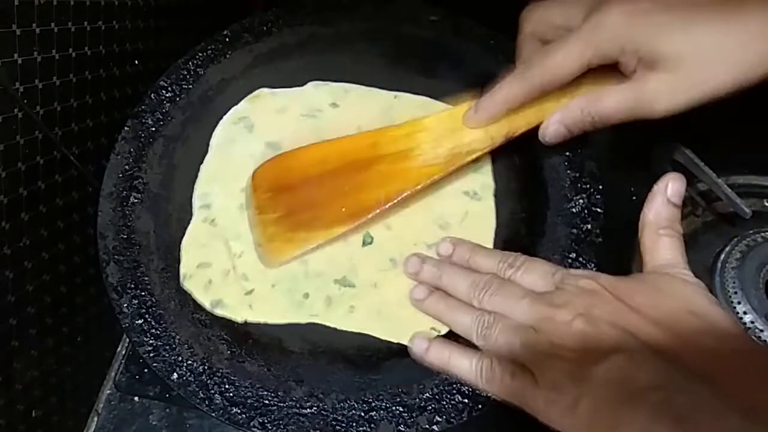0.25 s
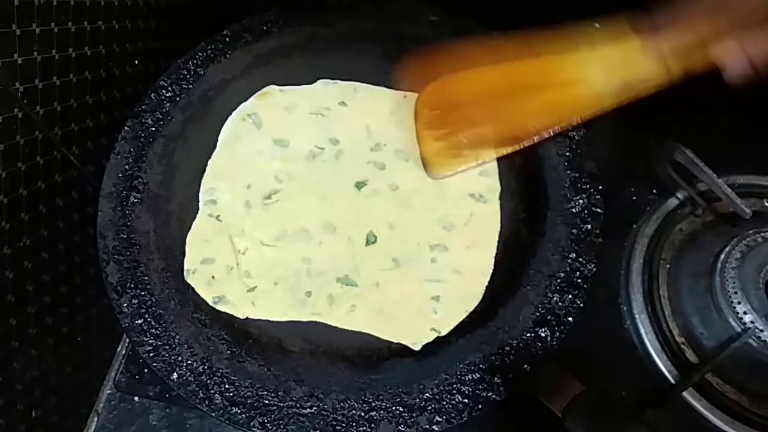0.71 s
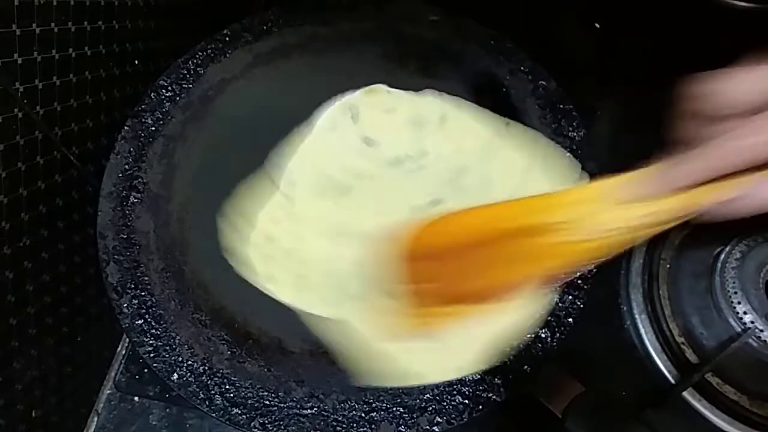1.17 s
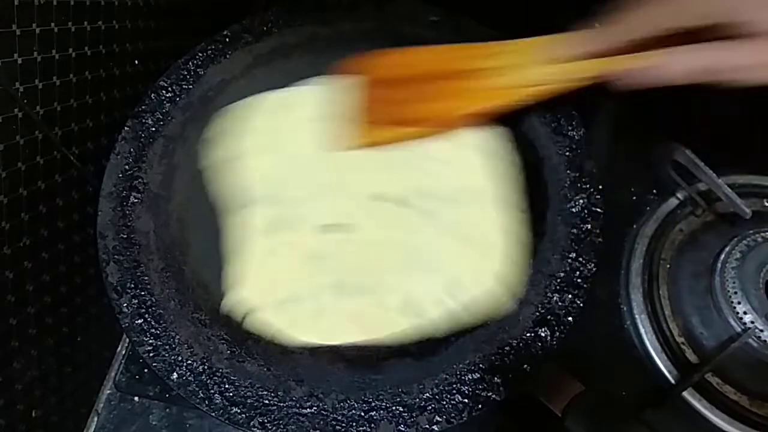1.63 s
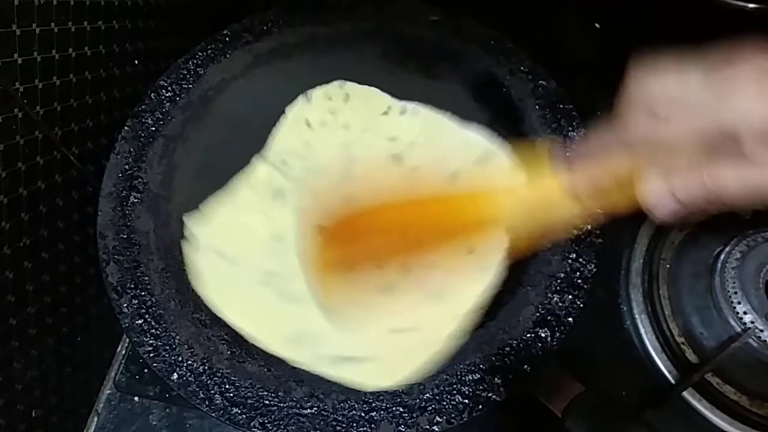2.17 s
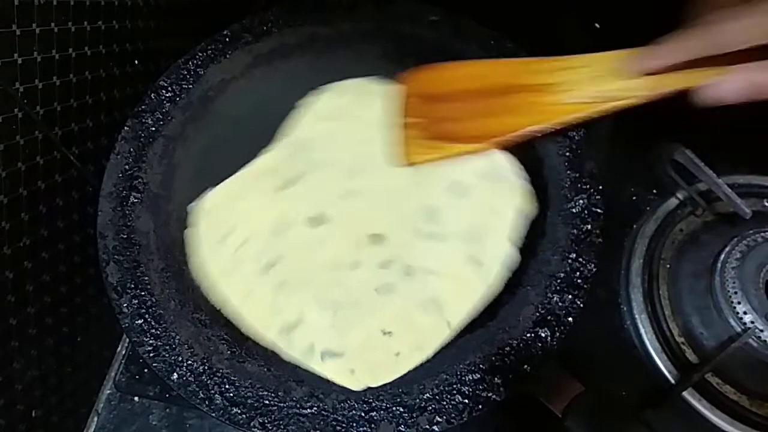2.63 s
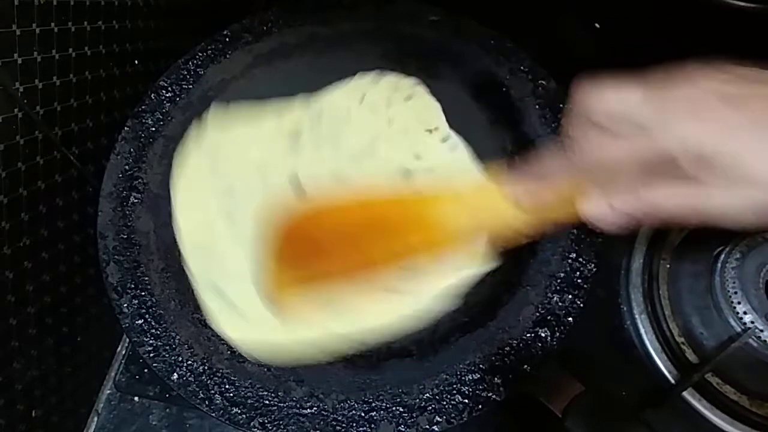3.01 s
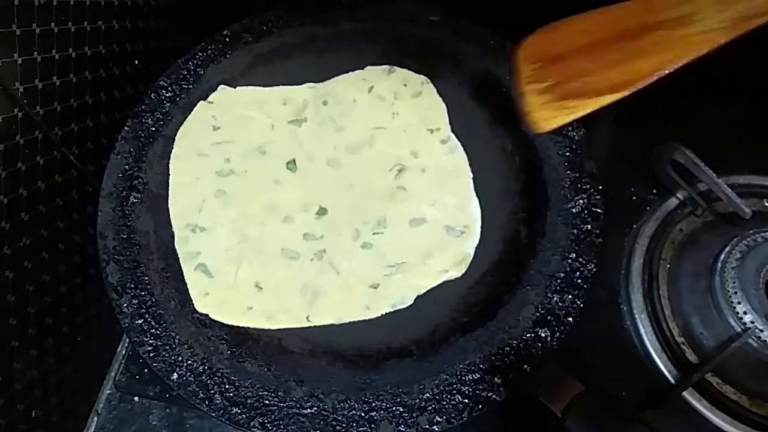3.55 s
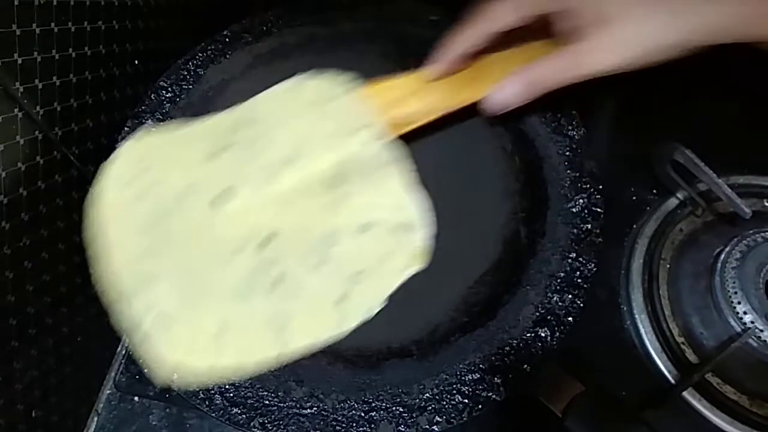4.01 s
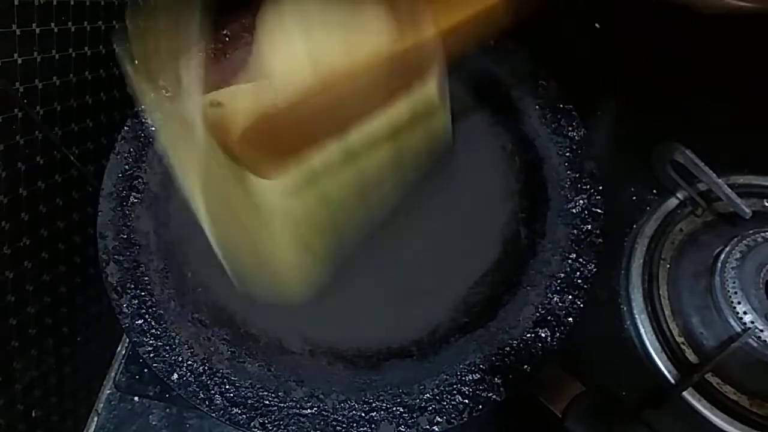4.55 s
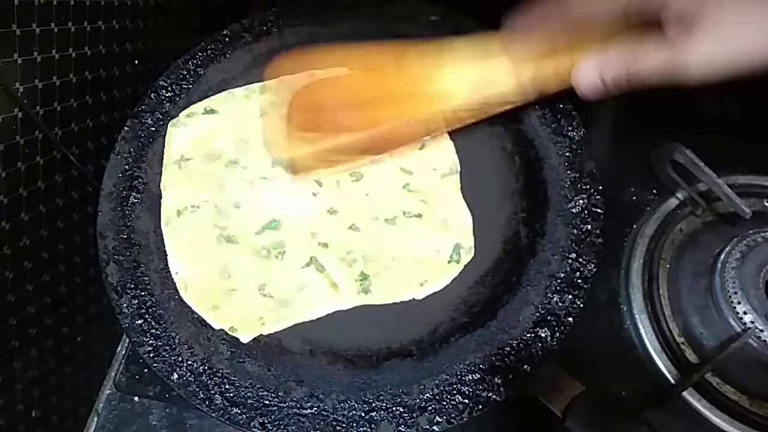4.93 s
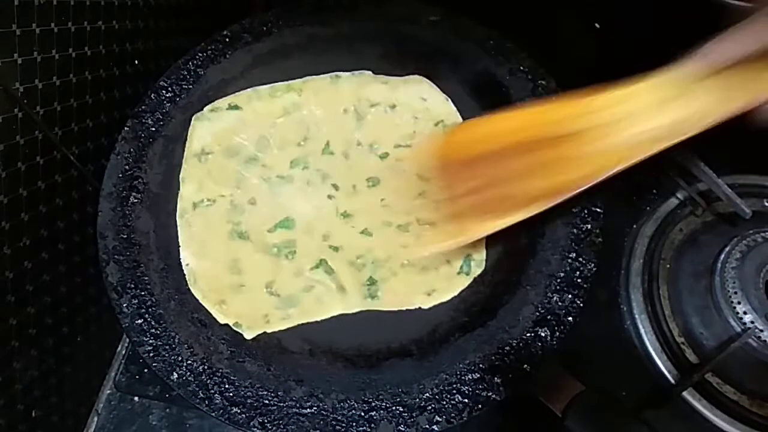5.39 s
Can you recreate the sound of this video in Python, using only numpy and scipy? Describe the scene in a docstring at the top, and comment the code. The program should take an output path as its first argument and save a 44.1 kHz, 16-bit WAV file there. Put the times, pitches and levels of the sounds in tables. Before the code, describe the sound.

In a small hard kitchen, heard close and slightly to the left, a wooden spatula shoves flatbread around a hot iron griddle. Low thumps and woody scrapes mix with airy, crackling hisses of sliding dough and tiny fat ticks. A longer hollow scrape sinks in pitch as the blade goes underneath; sharp knocks follow the flip, then firm presses and one last rub.

```python
"""A hiss of sliding dough and a low judder are heard first: a flatbread is spun on a hot iron griddle
with a wooden spatula, then lifted, flipped and pressed down. Friction noise makes the hiss and scrape,
stick-slip impulses and shoves ring the griddle's modes, and the blade drones in its own modes.
Short noise bursts make the wood's knocks on the iron and the ticks of hot fat.
A small hard kitchen answers, over a faint noise of the still room."""
import sys
import numpy as np
from scipy import signal
from scipy.fft import rfft, irfft, next_fast_len
from scipy.io import wavfile
from scipy.ndimage import map_coordinates

SR = 44100
rng = np.random.default_rng(int(sys.argv[2]) if len(sys.argv) > 2 else 0)


def master(y):
    """Save y as 16-bit WAV."""
    cut = np.clip(np.atleast_2d(y).T, -1, 1)
    pcm = np.round(cut * 32767)  # scale
    wavfile.write(sys.argv[1], SR, pcm.astype(np.int16))


N = 249857

# Still room, noise spectrum: hz, relative_level_db
ROOM_AIR = [(25, 14), (50, 12.5), (100, 3), (300, -18.5), (600, -21.5), (1200, -19.5), (3000, -39),
            (10000, -28.5), (16000, -41)]
# Reverberation of the kitchen: hz, t60_s
KITCHEN_DECAY = [(80, 0.86), (300, 0.3), (1200, 0.22), (5000, 0.27), (10000, 0.27), (16000, 0.066)]
# Difference between the ears in the reflections: hz, gain_db; long waves reach both ears alike
EAR_DIFFERENCE = [(100, -26.0), (300, 2.0), (600, 2.5), (2000, 3.5)]
# Lean to the left: hz, gain_db (up on the left, down on the right)
LEAN = [(100, 2.6), (400, 2.3), (1000, 2.53), (4500, 1.9), (9000, 2.9), (13000, .4)]
TOP_HZ = 15900

# Spitting fat: time_s, relative_peak_db
FAT_SPITS = [(0.0784, -22.5), (0.2648, -37), (0.3016, -28), (0.409, -32.5), (0.5367, -35.5),
             (0.5736, -35.5), (0.7118, -47), (0.741, -51.5), (0.9335, -40), (0.9675, -40), (1.1695, -35.5),
             (1.1864, -36), (1.27, -41.5), (1.732, -37.5), (1.7976, -35), (1.9759, -34), (2.2052, -41.5),
             (2.2232, -39), (2.235, -34), (2.246, -37.5), (2.2505, -31), (2.2942, -35.5), (2.3277, -35),
             (2.351, -35.5), (2.3655, -39.5), (2.6584, -40.5), (2.9228, -31.5), (2.9412, -41.5),
             (2.9612, -31.5), (3.057, -31), (3.0627, -34), (3.0997, -30.5), (3.487, -34.5), (4.318, -61.5),
             (4.8366, -33), (5.2579, -43)]
# Spectrum of fat ticks and crackle: hz, relative_level_db
FAT_SPECTRUM = [(2000, -26.5), (5000, -11.5), (7500, -10), (10000, 5), (13000, 2.5), (16000, 2)]

# Resonances of the griddle on its stove: centre_hz, width_hz, level_db
GRIDDLE_MODES = [(24.3, 27, -14), (52, 17, -29), (80.7, 7.5, -1), (107.4, 9.7, 0.5), (120, 14, -4),
                 (158.5, 8.7, 0.5), (184.4, 5.6, 3), (206.8, 11.5, 3), (259.6, 23, -1.5), (302.2, 14, -3),
                 (334.7, 17.5, -0.5), (408.4, 7.7, -5.5), (428.4, 11.9, -6.5), (512, 41.5, -8.5),
                 (611, 21.5, -7.5), (631.4, 26, -12), (1198, 32, -26.5)]
# Group delay of the griddle's answer to a shove: hz, delay_s
SETTLING_DELAY = [(100, 0.01004), (190, 0.01805), (250, 0.0082), (320, 0.00034)]
# Resonances of the plate under hard wood: centre_hz, width_hz, level_db
PLATE_MODES = [(1132, 32, 1.5), (1247, 48, 9), (1375, 80, 1), (1511, 45, 4.5), (1648, 100, -1.5),
               (1863, 110, -1), (2163, 210, -2.5), (2510, 260, -3), (3020, 260, -9.5), (3250, 120, -9),
               (3900, 350, -6.5), (4150, 140, -7), (4770, 200, -12), (5290, 450, -10), (6200, 300, -14.5)]
# Resonances of the wooden blade: centre_hz, width_hz, level_db
BLADE_MODES = [(758.4, 47, 3), (839, 27, 0), (869, 35, 5.5), (997, 31, -0.5), (1137, 50, 1)]

# Hard contacts of wood and iron: time_s, relative_peak_db, crack_db and clack_db relative to that peak
WOOD_KNOCKS = [(0.067, -37.5, 3, -0.5), (0.079, -36.5, -6, -2), (0.0971, -24, -7, -12),
               (0.239, -46, -11, -14), (0.5357, -33.5, -13, -15.5), (1.112, -47, -22, -17),
               (1.487, -44, -22, -12), (1.515, -42, -21.5, -8), (2.173, -44, -24, -14),
               (2.383, -34, -20, -15), (2.524, -42.5, -16, -2.5), (2.76, -42, 7.5, 4.5),
               (2.772, -34.5, -21, -4.5), (2.838, -44, -12, -21), (2.88, -42, 5, -0.5),
               (3.0, -42.5, 2.5, -4), (3.081, -40, -17, -8.5), (3.163, -46, -4, -18), (3.228, -48, -7, -16),
               (3.396, -32.5, -12, -9.5), (3.4, -32.5, -7, -14), (3.725, -38, -17, -5.5),
               (3.792, -41, -17, -9), (3.83, -42.5, -20, -9), (3.882, -47.5, -20, -6),
               (4.1, -36.5, 0, -0.5), (4.146, -41.5, 2, 1), (4.245, -51, -23.5, -6.5),
               (4.291, -55, -25, -1), (4.454, -38.5, 0.5, -19), (4.4632, -22.5, -16.5, -16.5),
               (4.485, -25, 8.5, -8), (4.4867, -30, 10.5, -7.5), (4.495, -34.5, -18, -2),
               (4.811, -46, -22, -3.5), (4.8181, -29, -7, -15), (4.921, -30.5, 1, -7),
               (4.93, -26.5, -4, -7), (4.969, -34.5, -0.5, -4), (5.468, -37, -19, -7),
               (5.48, -28, 2.5, -5.5)]
# Spectrum of a contact's bright crack: hz, relative_level_db
CRACK_SPECTRUM = [(1500, -21), (4000, 4.5), (7000, 1.5), (9000, 7), (11000, 8), (13000, 0.5), (16000, -8)]
# Spectrum of the dull wooden clack: hz, relative_level_db
CLACK_SPECTRUM = [(250, -11.5), (480, 14), (720, -11.5), (1000, -5.5), (1400, 1.5), (2000, -18.5),
                  (3000, -16), (4500, -7.5), (7000, -14), (12000, -27.5)]
# Spectrum of the snap of the blade's edge: hz, relative_level_db
SNAP_SPECTRUM = [(500, -22), (900, -11), (1300, 3), (2100, -3), (3000, -9), (6000, -19.5), (12000, -31.5)]

# Soft shoves that rock the griddle: time_s, relative_peak_db, shudder_db relative to that peak
SOFT_SHOVES = [(0.004, -25, -18.5), (0.06, -19.5, -11.5), (0.089, -17.5, -10.5), (0.117, -27, -15),
               (0.162, -24, -9.5), (0.234, -25.5, -9.5), (0.279, -30.5, -9.5), (0.332, -29.5, -11.5),
               (0.4, -28.5, -11.5), (0.441, -31, -11), (0.528, -29.5, -10.5), (1.005, -41, -13),
               (1.107, -32.5, -12.5), (1.148, -24.5, -9.5), (1.243, -29.5, -11.5), (1.31, -31.5, -12),
               (1.368, -32.5, -11), (1.437, -30, -13), (1.482, -29, -12), (1.516, -30.5, -10),
               (1.562, -28, -11), (1.69, -50, -11), (1.832, -45.5, -11), (1.857, -50, -10.5),
               (2.19, -41, -11.5), (2.373, -27.5, -10.5), (2.44, -37, -13), (2.523, -32, -10.5),
               (2.576, -34.5, -11.5), (2.665, -41.5, -9), (2.752, -25, -14), (2.762, -26.5, -21),
               (2.837, -33.5, -10), (2.873, -23.5, -10.5), (2.991, -24.5, -11), (3.074, -27, -10.5),
               (3.155, -31, -10), (3.22, -30.5, -11.5), (3.27, -35, -9), (3.313, -37, -11),
               (3.391, -31, -17.5), (3.732, -34, -21.5), (3.794, -41, -21), (4.086, -23.5, -9.5),
               (4.139, -26.5, -12.5), (4.243, -33.5, -10.5), (4.285, -38, -6.5), (4.466, -26.5, -13),
               (4.494, -28.5, -16), (4.567, -35, -8.5), (4.647, -38, -10), (4.703, -41, -12.5),
               (4.742, -54, -13), (4.853, -27.5, -14.5), (4.911, -22.5, -8), (4.931, -28, -18),
               (4.959, -22.5, -8), (5.001, -24.5, -7.5), (5.074, -35.5, -8), (5.442, -39, -15.5),
               (5.46, -30, -18), (5.497, -30, -13.5)]
SHUDDER_START_HZ, SHUDDER_SAG_HZ_PER_S = 335.7, 550  # the start is scattered by a few per cent
SHUDDER_HOLD_S, SHUDDER_FADE_DB_PER_S = 0.013, 651.5
# Damping of a shove by the dough: hz, gain_db
SHOVE_CUSHION = [(70, -6.5), (190, -5.0), (330, 0), (600, -3), (1200, -1.5)]
# Tone of the plate's chatter: hz, gain_db
CHATTER_TONE = [(1400, -6.5), (4000, -5.5)]

# Weight of the hand, which drives the lowest modes: time_s, gain_db
HAND_WEIGHT = [(0, 7), (.6, 0), (1.8, -1), (2.3, 14), (2.6, 2), (2.9, 10), (3.4, 3), (3.7, -22), (3.95, -1),
               (4.2, 0.5), (5.6, 14.5)]
# Part of the rumble that the weight changes: hz, gain_db
DEEP_PART = [(110, -7.5), (190, -26.5), (400, -54)]

# Strokes of the spatula: start_s, length_s, push_db, rub_db, drone_db (all three relative),
# easing_db_per_s (below 0 when bearing down)
SPATULA_STROKES = [(-0.03, 0.021, -33.5, -51.5, -49.5, 35.5), (0.069, 0.027, -56.5, -41.5, -42.5, 43),
                   (0.12, 0.45, -44, -55.5, -58, 14.5), (0.58, 0.13, -56.5, -61, -92, 72),
                   (0.978, 0.18, -55.5, -70, -72, -22), (1.098, 0.12, -44.5, -56.5, -56.5, 25),
                   (1.22, 0.155, -47.5, -61.5, -69, 10), (1.36, 0.069, -57, -66.5, -60.5, 9.5),
                   (1.459, 0.17, -45, -55, -59.5, 32), (1.816, 0.029, -67.5, -89, -93, 18),
                   (2.157, 0.061, -56, -57.5, -60, 12), (2.321, 0.045, -50, -60.5, -75, -59),
                   (2.358, 0.16, -43, -54.5, -58.5, 70), (2.488, 0.12, -44.5, -62, -57.5, 46),
                   (2.609, 0.1, -53, -78, -73, 58), (2.752, 0.024, -41, -50.5, -47, 20),
                   (2.809, 0.13, -44.5, -58, -63, 24), (2.978, 0.17, -48.5, -60.5, -65, 26),
                   (3.15, 0.32, -51.5, -69.5, -80, 8), (3.385, 0.015, -45.5, -48.5, -55.5, 33),
                   (3.48, 0.21, -83, -55.5, -81, -21), (3.713, 0.15, -46, -50.5, -69, -11.5),
                   (3.9, 0.14, -50, -55.5, -61, 12), (4.074, 0.15, -39.5, -52.5, -64.5, 50),
                   (4.22, 0.15, -48, -64.5, -82, 46.5), (4.439, 0.06, -41.5, -41.5, -52.5, 7.5),
                   (4.55, 0.1, -48, -60, -68, 71), (4.808, 0.13, -49.5, -52.5, -58, 23),
                   (4.89, 0.16, -35.5, -44, -52, 41.5), (4.998, 0.17, -43, -61, -64.5, 55),
                   (5.427, 0.033, -67, -60.5, -69, 2), (5.454, 0.18, -39.5, -49, -58.5, 46)]
STROKE_ATTACK_S = 0.03
PUSH_FADE_DB_PER_S, RUB_FADE_DB_PER_S, DRAG_FADE_DB_PER_S = 166, 177, 183  # once the hand lets go
# Damping of the push by the dough: hz, gain_db; it shapes the rumble of the modes
PUSH_CUSHION = [(560, 2.5), (720, -5.5), (1000, -13.5), (1250, 0.0), (2500, -8.5)]
# Dulling of the scrape by the oily surface: hz, gain_db
OIL_DULLING = [(1300, -0.5), (2300, -1), (3300, -2.5), (6000, -2.5)]
# Blade sliding under the bread: time_s, share of the rubbing's power that sounds in the gap (0-1),
# spacing_hz of the gap's resonances, loudest_hz of their bands
BLADE_UNDER_BREAD = [(3.45, 0.3, 722, 3800), (3.52, 0.96, 694, 3000), (3.59, 0.38, 654, 2720),
                     (3.65, 0.94, 623, 2300), (3.72, 0.83, 633, 1850), (3.77, 0.24, 600, 1850),
                     (3.81, 0, 529, 1650), (3.88, .6, 512, 1430), (3.96, 1, 385.7, 850),
                     (4.03, 1, 372, 720), (4.08, 0, 358, 700)]

# Slides of the bread over the iron: start_s, speeding_up_s, gliding_s, relative_level_db, slowing_db_per_s
BREAD_SLIDES = [(-0.03, 0.018, 0.01, -53, 154), (0.058, 0.019, 0.025, -51.5, 100.5),
                (0.24, 0.06, 0.15, -56, 66.5), (0.481, 0.22, 0.044, -46.5, 135),
                (0.977, 0.047, 0.13, -46.5, 112), (1.39, 0.071, 0.098, -46, 63),
                (1.775, 0.023, 0.17, -47, 149), (2.17, 0.065, 0.03, -59.5, 66),
                (2.33, 0.076, 0.093, -53.5, 121.5), (2.734, 0.013, 0.048, -45.5, 57.5),
                (3.447, 0.15, 0.13, -45, 62.5), (4.0, 0.052, 0.047, -50.5, 285),
                (4.442, 0.013, 0.048, -54, 106), (4.807, 0.025, 0.059, -50.5, 105),
                (4.88, 0.038, 0.06, -44.5, 128), (5.462, 0.028, 0.11, -45.5, 105)]
GLIDE_SAG_DB_PER_S = 5
# Sizzle of the resting dough: start_s, length_s, relative_level_db
DOUGH_RESTS = [(-0.03, 3.6, -63), (4.709, 0.03, -58), (5.24, 0.096, -62.5), (5.365, 0.15, -61)]
REST_ATTACK_S, REST_FADE_DB_PER_S = 0.12, 220
# Spectrum of the sliding dough: hz, relative_level_db
DOUGH_SPECTRUM = [(600, -42.5), (1500, -26.5), (2700, -13.5), (4300, -13), (6500, -8.5), (8200, -2.5),
                  (10300, 3), (12000, 0), (13500, -1.5), (16000, -3)]


def amp(db):
    """The decibel law: level to amplitude gain."""
    return 10 ** (np.asarray(db) / 20)


def unit(x):
    """Normalisation to rms 1."""
    return x / np.sqrt(np.mean(x ** 2) + 1e-20)


def along(points, hz):
    """Interpolation of (Hz, value) points on a logarithmic frequency axis."""
    f, v = np.transpose(points)
    return np.interp(np.log(hz + 1), np.log(f + 1), v)


def curves(rows):
    """Linear interpolation in time: one curve for each column after the time."""
    s, *cols = np.transpose(rows)
    return [np.interp(np.arange(N) / SR, s, c) for c in cols]


def wobble(rate):
    """Slow random fluctuation: a smooth curve through rate random knots per second."""
    knots = rng.standard_normal(int(N * rate / SR) + 4)
    return map_coordinates(knots, [np.arange(N) * rate / SR])


def filtered(x, response):
    """Linear filtering: the spectrum of x times a response that is a function of frequency."""
    n = x.shape[-1]
    m = next_fast_len(n + SR // 4)
    spectrum = rfft(x, m) * response(np.fft.rfftfreq(m, 1 / SR))
    return irfft(spectrum, m)[..., :n]


def coloured(x, spectrum):
    """Spectral shaping by a smooth gain curve in dB."""
    return filtered(x, lambda hz: amp(along(spectrum, hz)))


def ring(modes):
    """Modal superposition: the impulse response of damped resonances with alternating sign."""
    def body(f):
        total = 0
        for k, (centre, width, db) in enumerate(modes):
            damping = 1j * f * width
            total = total + (-1) ** k * amp(db) * damping / (centre ** 2 - f ** 2 + damping)
        return total
    return filtered(signal.unit_impulse(SR // 4), body)


def through(x, answer):
    """Convolution: a force excites a ringing body."""
    return signal.fftconvolve(x, answer)[:len(x)]


def grains(rate, spread_db):
    """Stick-slip friction as a random train of impulses of very unequal size, rms 1."""
    chance, size = rng.random(N), rng.standard_normal((2, N))
    slips = (chance < rate / SR) * np.sign(size[0])
    return unit(slips * amp(spread_db * size[1]))


def burst(t60):
    """A contact as a cluster of micro-impacts: noise that builds up quickly and decays exponentially."""
    t = np.arange(SR // 4) / SR
    return rng.standard_normal(len(t)) * amp(-60 * t / t60) * (1 - np.exp(-t / 0.00024))


def crack(t60):
    """A dry snap: keeping only the phase of a burst makes all frequencies about equally strong."""
    even = irfft(np.exp(1j * np.angle(rfft(burst(t60)))))
    return even[:SR // 20]


def spread(make, width):
    """Partial coherence of a wide source: a shared signal plus each ear's own, rms 1."""
    shared = make()
    return unit(np.array([shared + width * make(), shared + width * make()]))


def add(track, s, db, sound):
    """Superposition: a sound is placed at time s, scaled to a peak of db."""
    part = track[..., max(round(s * SR), 0):][..., :sound.shape[-1]]
    part += amp(db) * sound[..., :part.shape[-1]] / np.abs(sound).max()


def gesture(start, attack, length, sag, fade):
    """Envelope of a motion: a rise, a sag after it and a fade from start + length; slopes in dB per s."""
    t = np.maximum(np.arange(N) / SR - start, 0)
    loss_db = sag * np.clip(t - attack, 0, length) + fade * np.maximum(t - length, 0)
    return np.minimum(t / attack, 1) * amp(-loss_db)


def effort(fade, axis):
    """Power sum of all strokes as one gain; axis picks the push (0), the rub (1) or the drone (2)."""
    power = 0
    for s, length, *levels, easing in SPATULA_STROKES:
        gain = amp(levels[axis]) * gesture(s, STROKE_ATTACK_S, length, easing, fade)
        power = power + gain ** 2
    return np.sqrt(power)


def still_room(level_db):
    """Diffuse background: shaped noise, partly common to both ears."""
    air = rng.standard_normal(N) + 0.61 * rng.standard_normal((2, N))
    return amp(level_db) * unit(coloured(air, ROOM_AIR))


def kitchen(x, early_db, tail_db):
    """Room response: direct sound, early scatter from stove and near walls, and a decaying tail."""
    hz, t, z = signal.stft(rng.standard_normal((2, SR * 2 // 3)), SR, nperseg=256)
    decay = amp(-60 * t / along(KITCHEN_DECAY, hz)[:, None])
    tail = signal.istft(z * decay, SR, nperseg=256)[1]
    t = np.arange(tail.shape[1]) / SR
    early = rng.standard_normal(tail.shape) * amp(-60 * t / 0.013) * (t > .001)
    walls = amp(early_db) * early / np.linalg.norm(early[0])
    walls += amp(tail_db) * tail / np.linalg.norm(tail[0])
    mid = (walls[0] + walls[1]) / np.sqrt(2)
    side = coloured((walls[0] - walls[1]) / np.sqrt(2), EAR_DIFFERENCE)
    walls = np.array([mid + side, mid - side]) / np.sqrt(2)
    return x + signal.fftconvolve(np.atleast_2d(x), walls, axes=1)[:, :N]


def spits(level_db):
    """Impulsive radiation: fat droplets burst in very short ticks, some brighter than others."""
    out = np.zeros((2, N))
    for s, db in FAT_SPITS:
        tilt = [(5000, 0.00065), (14000, 3 * rng.standard_normal())]  # (Hz, dB)
        tick = spread(lambda: coloured(coloured(crack(t60=0.007), FAT_SPECTRUM), tilt), width=1.0)
        add(out, s, db + level_db, tick)
    return out


def knocks(plate_db, snap_db, crack_db, scuff):
    """Impact excitation: edge snap, dull wooden clack, brief ring of the plate and bright crack."""
    out, plate = np.zeros((2, N)), ring(PLATE_MODES)
    for s, db, treble_db, wood_db in WOOD_KNOCKS:
        blow = scuff * burst(t60=0.011)
        blow[0] += 1

        def plate_ring():
            uneven = 1 + 0.5 * rng.standard_normal(len(blow))
            return through(blow * uneven, plate)

        snap = spread(lambda: coloured(crack(t60=0.0085), SNAP_SPECTRUM), width=1.0)
        bright = spread(lambda: coloured(crack(t60=0.011), CRACK_SPECTRUM), width=0.69)
        add(out, s, db + snap_db, snap)
        add(out, s, db + wood_db, coloured(burst(t60=0.055), CLACK_SPECTRUM))
        add(out, s, db + plate_db, spread(plate_ring, width=0.8))
        add(out, s, db + treble_db + crack_db, bright)
    return out


def shudder():
    """Stick-slip oscillation of the blade: a short woody note of sinking pitch."""
    t = np.arange(SR // 4) / SR
    hz = SHUDDER_START_HZ * np.exp(0.027 * rng.standard_normal()) - SHUDDER_SAG_HZ_PER_S * t
    fade_db = SHUDDER_FADE_DB_PER_S * np.maximum(t - SHUDDER_HOLD_S, 0)
    return np.sin(2 * np.pi * np.cumsum(hz) / SR) * amp(-fade_db)


def shoves(level_db, drag, rattle_db):
    """Transient forcing: a push and a short drag ring the griddle; the plate chatters as it rocks back."""
    out, chatter, plate = np.zeros(N), np.zeros(N), ring(PLATE_MODES)

    def settling(hz):
        # phase is the integral of the group delay: low modes answer later
        return np.exp(-2j * np.pi * np.cumsum(along(SETTLING_DELAY, hz)) * hz[1])

    iron = coloured(filtered(ring(GRIDDLE_MODES), settling), SHOVE_CUSHION)
    for s, db, shudder_db in SOFT_SHOVES:
        force = drag * burst(t60=0.075)
        force[0] += 1
        add(out, s, db + level_db, through(force, iron))
        add(out, s + 0.002, db + shudder_db, shudder())
        add(chatter, s + 0.01, db + rattle_db, through(burst(t60=0.028), plate))
    return out + coloured(chatter, CHATTER_TONE)


def pushing(level_db, judder_db):
    """Stick-slip excitation: the spatula catches on the dough and the griddle's modes rumble."""
    force = grains(rate=900, spread_db=-1.0) * amp(judder_db * wobble(40))
    rumble = unit(coloured(through(force, ring(GRIDDLE_MODES)), PUSH_CUSHION))
    return amp(level_db) * effort(PUSH_FADE_DB_PER_S, axis=0) * rumble


def stove(rumble):
    """Load-dependent response: the deepest part of the rumble follows the weight of the hand."""
    weight_db, = curves(HAND_WEIGHT)
    return rumble + (amp(weight_db) - 1) * coloured(rumble, DEEP_PART)


def dragging(level_db):
    """Friction-driven bending: the dragged blade drones in its modes."""
    drone = spread(lambda: through(grains(rate=760, spread_db=5.5), ring(BLADE_MODES)), width=0.82)
    return amp(level_db) * effort(DRAG_FADE_DB_PER_S, axis=2) * drone


def gap(gap_hz, loudest_hz, width_hz, skirt_db, jitter):
    """Cavity resonance: scraping noise sings in the wedge of blade and iron, lower as the blade goes deeper."""
    out = np.zeros(N)
    for k in range(2, 8):
        # each resonance wanders as the dough flexes
        phase = 2 * np.pi * np.cumsum(k * gap_hz * (1 + jitter * wobble(55))) / SR
        octaves_off = np.abs(np.log2(k * gap_hz / loudest_hz))
        out += amp(-skirt_db * octaves_off) * wobble(width_hz) * np.cos(phase)
    return unit(out)


def rubbing(level_db, gap_db, catch_db):
    """Granular friction of wood and crust on iron; under the bread the scrape turns hollow."""
    share, gap_hz, loudest_hz = curves(BLADE_UNDER_BREAD)
    catch = amp(catch_db * wobble(60))

    def scrape():
        force = grains(rate=1000, spread_db=3.5) * catch
        return coloured(through(force, ring(PLATE_MODES)), OIL_DULLING)

    plate = spread(scrape, width=0.99)
    hollow = spread(lambda: gap(gap_hz, loudest_hz, width_hz=300, skirt_db=9, jitter=0.016), width=0.59)
    hollow = amp(gap_db) * unit(hollow * amp(1.0 * wobble(140)))
    blend = np.sqrt(1 - share) * plate + np.sqrt(share) * hollow
    return amp(level_db) * effort(RUB_FADE_DB_PER_S, axis=1) * blend


def searing():
    """Power sum of motion and rest: the hiss swells with each slide, over a quiet sizzle at rest."""
    moving = [amp(db) * gesture(s, rise, rise + glide, GLIDE_SAG_DB_PER_S, fade)
              for s, rise, glide, db, fade in BREAD_SLIDES]
    still = [amp(db) * gesture(s, REST_ATTACK_S, length, 0, REST_FADE_DB_PER_S)
             for s, length, db in DOUGH_RESTS]
    return np.linalg.norm(moving + still, axis=0)


def sliding(level_db, flutter_db, crackle_db):
    """Dense random impulses: moist dough hisses and crackles where it is dragged over hot iron."""
    fizz = spread(lambda: coloured(grains(rate=13000, spread_db=7.0), DOUGH_SPECTRUM), width=3.6)
    crackle = spread(lambda: coloured(grains(rate=130, spread_db=0.5), FAT_SPECTRUM), width=0.55)
    flutter = amp(level_db + flutter_db * wobble(45))
    return searing() * flutter * (fizz + amp(crackle_db) * crackle)


def scene():
    """Superposition of all sources on the griddle, a little to the left, in the still room."""
    low = pushing(level_db=-3.0, judder_db=2.0) + shoves(level_db=-11.0, drag=0.06, rattle_db=-21.5)
    friction = rubbing(level_db=-4.0, gap_db=-2.0, catch_db=4.2) + dragging(level_db=-2.5)
    friction += sliding(level_db=-0.06, flutter_db=0.9, crackle_db=-25.0)
    contacts = knocks(plate_db=-9.5, snap_db=-4.0, crack_db=0, scuff=0.3)
    sound = kitchen(stove(low), early_db=-18, tail_db=-14)
    sound += kitchen(friction, early_db=-12, tail_db=-7)
    sound += kitchen(contacts, early_db=-7, tail_db=-3.5)
    sound += kitchen(spits(level_db=3.0), early_db=-6.5, tail_db=-6)
    sound = filtered(sound, lambda hz: amp(np.outer([1, -1], along(LEAN, hz))))
    return sound + still_room(level_db=-74.0)


def record(dry):
    """Band limitation: nothing at or above the top frequency passes."""
    return filtered(dry, lambda hz: hz < TOP_HZ)


dry = scene()
out = record(dry)
master(out)
```